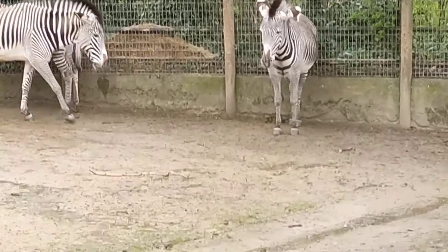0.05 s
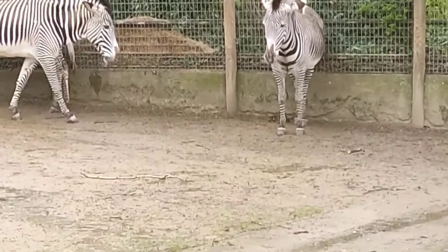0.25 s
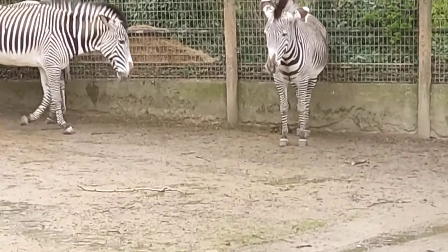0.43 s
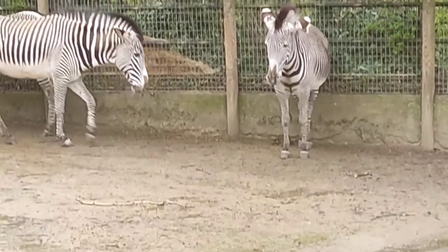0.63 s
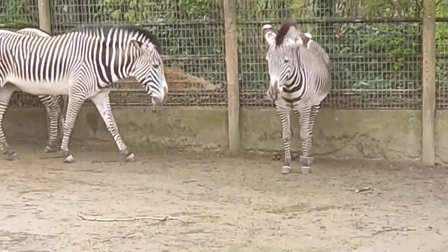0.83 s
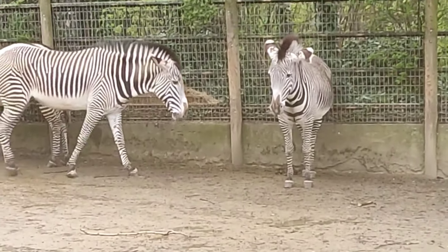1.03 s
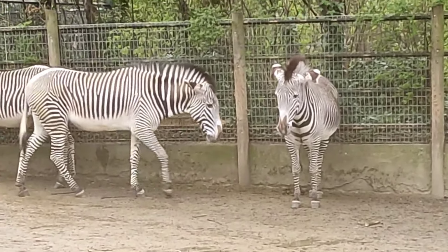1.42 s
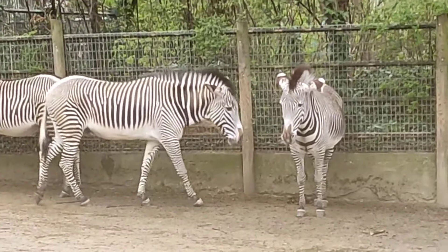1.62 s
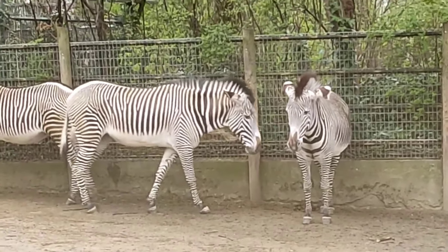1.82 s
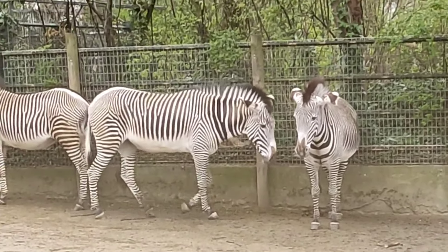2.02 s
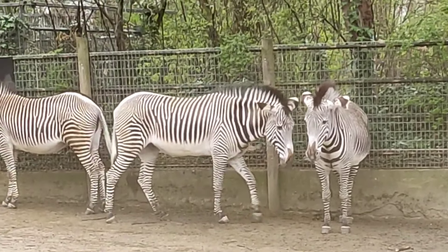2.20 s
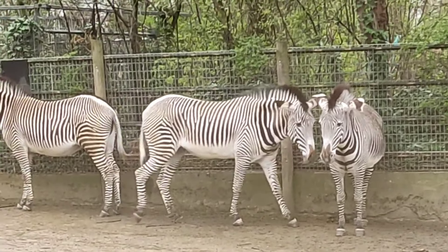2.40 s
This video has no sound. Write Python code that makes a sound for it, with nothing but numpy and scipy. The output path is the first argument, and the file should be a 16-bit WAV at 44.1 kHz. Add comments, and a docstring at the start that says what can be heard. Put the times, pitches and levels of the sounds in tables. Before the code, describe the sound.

A zebra gives a brief, thin, wavering squeal from about 0.2 to 0.4 seconds. At 1 second it lets out a lower, harsh, rasping bark that drops away by 1.4 seconds. Both calls echo briefly outdoors. Soft, gritty hoof steps fall near 0.6 and 0.95 seconds, then more often from 1.5 to 2.2 seconds. Faint bird notes, a distant rumble and a soft hiss lie underneath.

```python
"""A thin, wavering squeal, then a lower, rasping bark: a zebra calls twice in an outdoor pen.
Both calls are a source shaped by a filter: the squeal's harmonics flash as they cross one sharp
resonance, and the bark is a pulsing voice with air rushing through it.
Walls and trees echo both; hooves scuff the dirt over faint birds, a distant rumble and a soft hiss."""
import sys
import numpy as np
from scipy import signal
from scipy.fft import rfft, irfft
from scipy.io import wavfile

SR = 44100
rng = np.random.default_rng(int(sys.argv[2]) if len(sys.argv) > 2 else 0)


def materialize(psi):
    """Save the field psi as 16-bit PCM at rate SR to the path in sys.argv[1].

    A 1-D psi becomes a single channel; in a 2-D psi each row is a channel.
    """
    bounded = np.clip(np.atleast_2d(psi).T, -1, 1)
    quanta = np.round(bounded * 32767).astype(np.int16)
    wavfile.write(sys.argv[1], SR, quanta)


N = 112454
T = np.arange(N) / SR
FREQS = np.maximum(np.fft.rfftfreq(N, 1 / SR), 1)

SHRILL_HZ, SHRILL_WIDTH_HZ, SHRILL_DB = 8750, 300, 11
SQUEAL_JITTER, BLUR_RAD_PER_HARMONIC, FLICKER_DB, BREATH_DB = .0061, .06, 1.5, -14
# Fundamental of the squeal (time [s], frequency [Hz])
SQUEAL_PITCH = [(.226, 1056), (.231, 1083), (.236, 1165), (.243, 1160), (.251, 1096), (.256, 1196),
                (.264, 1198), (.269, 1246), (.278, 1287), (.287, 1250), (.292, 1197), (.300, 1270),
                (.305, 1328), (.317, 1334), (.326, 1241), (.334, 1343), (.346, 1354), (.356, 1271),
                (.367, 1307), (.375, 1237), (.380, 1134), (.386, 1133)]
# Envelope (time [s], level [dB], extra gain of overtones and breath [dB])
SQUEAL_LEVEL = [(.223, -61, -14), (.229, -32.5, 3), (.243, -26, 0.5), (.251, -33.5, 11), (.257, -31.5, -2),
                (.270, -24, -2), (.283, -24, -3), (.293, -27, 2.5), (.308, -24, -1), (.326, -24.5, -2),
                (.345, -24.5, 0), (.372, -25.5, -0.5), (.380, -32.5, 8.5), (.387, -44.5, 24.5)]
# Tone colour of the squeal's overtones and breath (frequency [Hz], gain [dB])
SQUEAL_COLOUR = [(1400, -34), (2000, -17), (2600, -21.5), (3200, -27.5), (3900, -19), (4500, -18.5),
                 (5200, -12.5), (5800, -18), (6400, -10), (7000, -28), (8000, -9), (9500, -17),
                 (10500, -31), (11500, -42), (13000, -22), (14500, -25), (16000, -41)]
# Stereo balance (frequency [Hz], left minus right [dB])
SQUEAL_BALANCE = [(600, -16), (1290, 8), (2400, 1), (4000, -6.5), (6000, 2.5), (7600, -6), (8800, -17.5),
                  (10200, 5), (14500, 6)]


def squeal():
    """Resonance: harmonics 7 and 8 of a near-pure tone ring out as they sweep through a sharp peak."""
    def timbre(f):
        peak = abs(resonance(f, SHRILL_HZ, SHRILL_WIDTH_HZ)) ** 2
        return colour(SQUEAL_COLOUR, f) + undb(SHRILL_DB) * peak

    hz = curve(SQUEAL_PITCH) * (1 + SQUEAL_JITTER * wander(330))
    phase = 2 * np.pi * np.cumsum(hz) / SR
    overtones = np.zeros(N)
    for k in range(2, 14):
        blur = BLUR_RAD_PER_HARMONIC * k * wander(450)
        flicker = undb(FLICKER_DB * wander(220))
        overtones += timbre(k * hz) * np.sin(k * phase + blur) * flicker
    breath = undb(BREATH_DB) * turbulence(timbre(FREQS) * FREQS / (FREQS + 12000))
    edge = undb(curve(SQUEAL_LEVEL, column=2)) * (overtones + breath)
    call = np.sqrt(2) * (np.sin(phase) + edge) * envelope(SQUEAL_LEVEL)
    return pen(call, SQUEAL_BALANCE, wet_db=-8.5)


BARK_JITTER, SLIP_RAD, ALTERNATION, SHIMMER_DB, FLUTTER = .0025, .11, .7, 3, .73
FADE_START_S, FADE_DB_PER_S, FADE_ABOVE_HZ = 1.233, 125, 1500
# Fundamental of the bark (time [s], frequency [Hz])
BARK_PITCH = [(1.01, 250), (1.05, 266), (1.086, 280), (1.105, 284), (1.15, 285.3), (1.2, 284.3),
              (1.225, 279.5), (1.28, 278), (1.32, 268), (1.35, 250), (1.38, 235), (1.43, 228)]
# Envelope (time [s], voice level [dB], rattle level [dB], roughness [ratio, capped at 1])
BARK_LEVEL = [(1.005, -50, -65, 0.6), (1.028, -36, -40, 0.83), (1.062, -30, -50, 0.1),
              (1.086, -29.5, -45, 0.26), (1.11, -25.5, -69, 0), (1.17, -27, -56, 0.19),
              (1.205, -25.5, -59, 0), (1.226, -29.5, -68, 0.1), (1.29, -26, -71, 0.33),
              (1.33, -39.5, -44, 1), (1.385, -40.5, -43, 1.08), (1.44, -63, -55, 1)]
# Air rushing through the bark (time [s], level [dB])
BARK_AIR = [(1.005, -60), (1.028, -31), (1.062, -33), (1.086, -27), (1.11, -32), (1.165, -35), (1.2, -30),
            (1.226, -37), (1.29, -36), (1.315, -35), (1.375, -44), (1.44, -66)]
# Resonant peaks: broad voice formants plus narrow treble peaks coloured by nearby reflections
# (frequency [Hz], nominal width [Hz], voice gain [dB], air gain [dB])
BARK_PEAKS = [(286, 230, -10.5, -45), (855, 58, -6.5, -12), (1103, 162, -1, -7.5), (1415, 110, -26, -2.5),
              (1780, 190, -5.5, -21), (2482, 200, -3, -7), (2986, 650, -27, -4.5), (3139, 48, 5, -18),
              (3446, 91, 2, -4), (3806, 370, 1, -10), (4350, 330, -19, 1.5), (4880, 46, 10.5, -8),
              (5170, 167, 4.5, -2), (5560, 130, -2.5, -0.5), (6200, 510, -4, -13), (6860, 540, -13.5, -9.5),
              (7730, 140, -4, -14), (8480, 720, -25, -5.5), (9060, 320, -6, -4), (9980, 1260, -11, -13),
              (13140, 690, -17, -36)]
# Spectrum of the low rattle (frequency [Hz], relative level [dB])
RATTLE = [(400, -33), (720, 5), (1050, 13.5), (1350, -2), (1700, -3), (2100, 0.5), (3000, -36), (8000, -50)]
# Stereo balance (frequency [Hz], left minus right [dB])
BARK_BALANCE = [(280, 4), (800, -8), (1200, 7.5), (2500, 5.5), (3700, 1), (5400, 1.5), (6600, -3.5),
                (8200, -27), (10000, 2)]


def bark():
    """Source and filter: voice pulses and puffs of air pass through a bank of resonant peaks."""
    hz = curve(BARK_PITCH) * (1 + BARK_JITTER * wander(260))
    phase = 2 * np.pi * np.cumsum(hz) / SR
    # Period doubling: in a rough voice the pulses alternate strong and weak and slip in time.
    subharmonic = np.cos(phase / 2)
    rough = np.clip(curve(BARK_LEVEL, column=3), 0, 1)
    slip = rough * SLIP_RAD * (wander(130) + subharmonic)
    pulses = sum(np.cos(k * (phase + slip)) for k in range(1, 52))
    pulses *= (1 + rough * ALTERNATION * subharmonic) * undb(rough * SHIMMER_DB * wander(150))
    centres, widths, voice_db, air_db = np.array(BARK_PEAKS).T
    peaks = np.array([resonance(FREQS, f, .89 * width) ** 2 for f, width in zip(centres, widths)])
    voice_gain = np.sqrt(undb(voice_db) ** 2 @ abs(peaks) ** 2)  # peaks add in power
    air_gain = np.sqrt(undb(air_db) ** 2 @ abs(peaks) ** 2)
    voice = shape(pulses, voice_gain * np.exp(1j * np.angle(sum(peaks))))
    effort = envelope(BARK_LEVEL)
    voice /= np.sqrt(np.average(voice ** 2, weights=effort ** 2))
    # The voice loses its treble as it gives out.
    low = shape(voice, 1 / (1 + (FREQS / FADE_ABOVE_HZ) ** 8))
    voice = low + (voice - low) * undb(-FADE_DB_PER_S * np.maximum(T - FADE_START_S, 0))
    puffs = turbulence(gain=1) * (1 + FLUTTER * np.cos(phase))
    rasp = unit(shape(puffs, air_gain)) * envelope(BARK_AIR)
    rattle = noise(colour(RATTLE))[0] * (1 + FLUTTER * subharmonic)
    call = voice * effort + rasp + rattle * envelope(BARK_LEVEL, column=2) + air_surges()
    return pen(call, BARK_BALANCE, wet_db=-11, left_lag_ms=.057)


# Surges in the bark (peak time [s], 1/e half-length [s], centre [Hz], nominal width [Hz], level [dB])
SURGES = [(1.087, .012, 3550, 800, -28), (1.09, .016, 8550, 600, -33), (1.194, .012, 4700, 1600, -31),
          (1.196, .009, 8600, 900, -30), (1.32, .03, 3600, 550, -35)]


def air_surges():
    """Band-limited turbulence: harsh rushes of air swell and fade under Gaussian envelopes."""
    out = np.zeros((2, N))
    for peak_s, half_s, hz, width_hz, db in SURGES:
        band = turbulence(abs(resonance(FREQS, hz, width_hz)) ** 2)
        out += band * undb(db) * np.exp(-((T - peak_s) / half_s) ** 2)
    return out


THUD_HZ, HOOF_ATTACK_S = 490, .00043
KNOCK_DECAY_S, THUD_DECAY_S, GRIT_DECAY_S = .0015, .0034, .007
# Hoof impacts (time [s], thud level [dB], grit level [dB], knock level [dB])
STEPS = [(0.592, -35.5, -37, -42), (0.95, -46, -37.5, -52), (1.507, -43, -43.5, -43),
         (1.747, -37.5, -42, -45), (1.902, -56, -37.5, -59), (1.997, -45, -41, -44),
         (2.0206, -32.5, -39.5, -33.5), (2.221, -54, -36.5, -44)]
# Spectrum of the knock (frequency [Hz], relative level [dB])
KNOCK = [(300, 1), (900, 1), (2000, -4), (5000, -9), (15000, -26)]
# Spectrum of the grit (frequency [Hz], relative level [dB])
GRIT = [(700, -29), (2500, 3), (6000, 2), (9000, 15), (12000, 7), (15000, -22)]


def hooves():
    """Damped impact: each step is a crisp knock, a dull thud and a crunch, all decaying exponentially."""
    knock = noise(colour(KNOCK))
    grit = unit(turbulence(colour(GRIT)) * undb(2.9 * wander(470)))
    out = np.zeros((2, N))
    for start, thud_db, grit_db, knock_db in STEPS:
        age = np.maximum(T - start, 0)
        thud = undb(thud_db) * np.sin(2 * np.pi * THUD_HZ * age) * np.exp(-age / THUD_DECAY_S)
        crunch = undb(grit_db) * grit * np.exp(-age / GRIT_DECAY_S)
        out += undb(knock_db) * knock * (T > start) * np.exp(-age / KNOCK_DECAY_S)
        out += (1 - np.exp(-age / HOOF_ATTACK_S)) * (thud + crunch)
    return out


BIRD_BLUR_HZ, BIRD_ARCH_HZ = 85, 60
# Distant bird notes (start [s], duration [s], frequency [Hz], level [dB])
BIRD_NOTES = [(.61, .11, 4010, -56), (.83, .14, 5250, -59), (1.542, .12, 5250, -62),
              (1.645, .14, 3940, -60), (1.898, .11, 5190, -59), (2.018, .12, 4010, -61),
              (2.05, 0.046, 6430, -58), (2.237, .12, 5280, -61), (2.394, .1, 4210, -59)]


def birds():
    """Scattering: trees blur far-off notes that rise and fall a little."""
    out = np.zeros(N)
    for start, length, hz, db in BIRD_NOTES:
        arch = np.sin(np.pi * np.clip((T - start) / length, 0, 1)).clip(0)
        phase = 2 * np.pi * np.cumsum(hz + BIRD_ARCH_HZ * (arch - np.pi / 4)) / SR
        note = wander(BIRD_BLUR_HZ) * np.cos(phase) + wander(BIRD_BLUR_HZ) * np.sin(phase)
        out += undb(db) * np.sqrt(arch) * note
    return out


RUMBLE_FROM_HZ, HISS_FROM_HZ = 50, 216
# Spectrum of the ambient noise (frequency [Hz], relative density [dB])
AMBIENT = [(15, -54), (25, 3), (48, 5), (101, -3), (198, -9.5), (233, -7.5), (433, -13), (895, -21),
           (1300, -18.5), (1710, -24), (3630, -23), (4150, -21.5), (4870, -26.5), (7500, -27.5),
           (9050, -20.5), (14300, -35), (15500, -39)]
# Stereo width (frequency [Hz], side minus mid [dB])
AMBIENT_WIDTH = [(15, 12), (70, -20), (250, -12.5), (600, -4.5), (1500, -0.5), (9000, 1)]
# Slow drift in level (time [s], rumble gain [dB], hiss gain [dB])
AMBIENT_DRIFT = [(0, -45.5, -42), (.55, -47, -42.5), (.75, -47.5, -45.5), (.95, -46, -44),
                 (1.5, -47, -45.5), (1.98, -44.5, -46), (2.15, -44, -47.5), (2.55, -46.5, -46.5)]


def background():
    """Coherence sets width: a distant rumble is alike on both sides, a soft hiss differs and spreads."""
    mid, side = rng.standard_normal((2, N))
    mid = shape(mid, colour(AMBIENT))
    side = shape(side, colour(AMBIENT) * colour(AMBIENT_WIDTH))
    low_cut = FREQS / np.hypot(FREQS, RUMBLE_FROM_HZ)
    both = shape(np.array([mid + side, mid - side]), low_cut) / mid.std()
    rumble = shape(both, 1 / (1 + (FREQS / HISS_FROM_HZ) ** 2))
    hiss = both - rumble
    return rumble * undb(curve(AMBIENT_DRIFT)) + hiss * undb(curve(AMBIENT_DRIFT, column=2))


PEN_DELAY_S, PEN_BUILD_S, PEN_T60_S, PEN_TREBLE_T60_S = .017, .014, .8, .46
PEN_TREBLE_DB = 6  # hard walls send the treble back strongly


def pen(x, balance, wet_db, left_lag_ms=0):
    """Reverberation: scatter from walls and trees follows the direct sound, and its treble dies first."""
    lean = np.sqrt(colour(balance))
    lag = np.exp(-2j * np.pi * FREQS * left_lag_ms / 1000)
    pan = np.array([lean * lag, 1 / lean]) / np.sqrt((lean ** 2 + lean ** -2) / 2)
    direct = shape(x, pan)
    scatter = rng.standard_normal((2, N))
    age = np.maximum(T - PEN_DELAY_S, 0)
    low_pass = 1 / (1 + (FREQS / 3000) ** 4)
    low = shape(scatter, low_pass) * undb(-60 * age / PEN_T60_S)
    treble = shape(scatter, 1 - low_pass) * undb(PEN_TREBLE_DB - 60 * age / PEN_TREBLE_T60_S)
    tail = unit((low + treble) * (1 - np.exp(-age / PEN_BUILD_S))) / np.sqrt(N)
    return direct + undb(wet_db) * signal.fftconvolve(direct, tail, axes=1)[:, :N]


def turbulence(gain, spread=.87):
    """Partial coherence: stereo noise in which the share `spread` of the power differs between sides."""
    return np.sqrt(1 - spread) * noise(gain) + np.sqrt(spread) * noise(gain, channels=2)


def wander(rate_hz):
    """Random modulation: low-pass noise of rms 1."""
    return noise(1 / (1 + (FREQS / rate_hz) ** 4))[0]


def noise(gain, channels=1):
    """Spectral shaping: coloured noise of rms 1."""
    return unit(shape(rng.standard_normal((channels, N)), gain))


def resonance(f, hz, width_hz):
    """Damped oscillator: the complex gain of one mode."""
    return 1 / (1 + 1j * (f / hz - hz / f) * hz / width_hz)


def shape(x, gain):
    """Linear filtering: one gain for each frequency."""
    return irfft(rfft(x) * gain, N)


def colour(points, hz=FREQS):
    """Frequency response: gain from (frequency [Hz], level [dB]) points."""
    rows = np.array(points)
    return undb(np.interp(np.log(hz), np.log(rows[:, 0]), rows[:, 1]))


def envelope(table, column=1):
    """Amplitude envelope: gain from a dB curve, silent outside it."""
    return undb(curve(table, column)) * (T > table[0][0]) * (T < table[-1][0])


def curve(table, column=1):
    """Linear interpolation of one column in time."""
    rows = np.array(table)
    return np.interp(T, rows[:, 0], rows[:, column])


def undb(db):
    """Decibels to amplitude ratio."""
    return 10 ** (np.asarray(db) / 20)


def unit(x):
    """Normalisation to rms 1."""
    return x / np.sqrt(np.mean(x ** 2))


def scene():
    """Superposition: the calls, the steps and the surroundings add."""
    return squeal() + bark() + hooves() + birds() + background()


def record(dry, cutoff_hz=15100):
    """Band limiting: a steep low-pass filter cuts the top."""
    return signal.sosfilt(signal.ellip(8, .2, 80, cutoff_hz, fs=SR, output="sos"), dry)


dry = scene()
out = record(dry)
materialize(out)
```